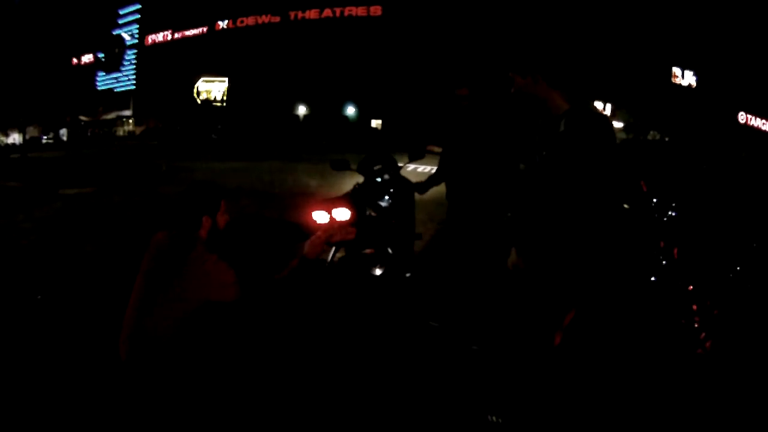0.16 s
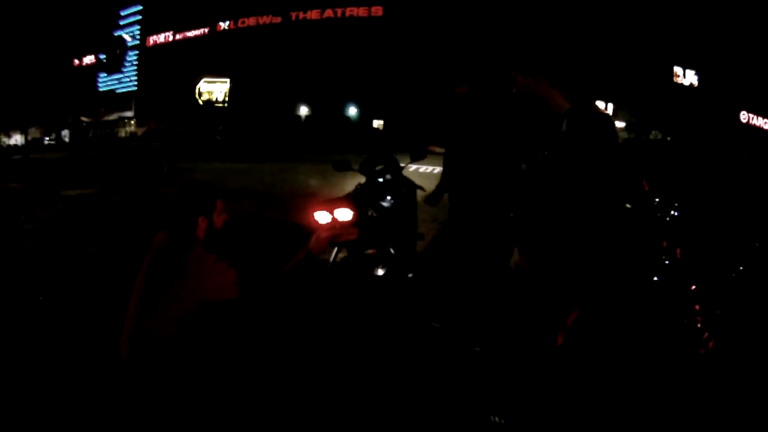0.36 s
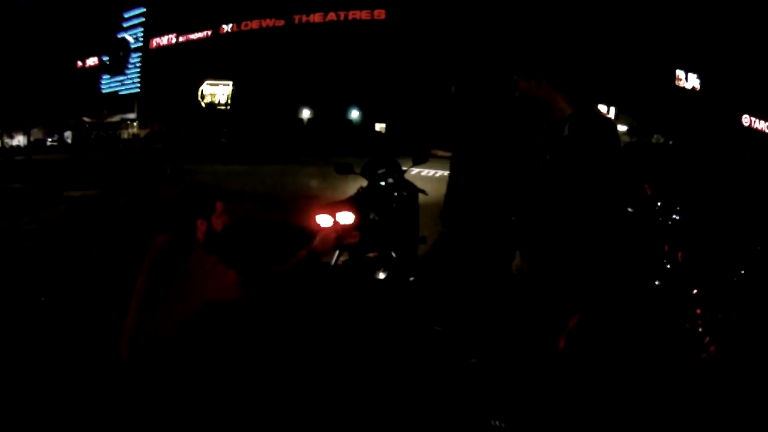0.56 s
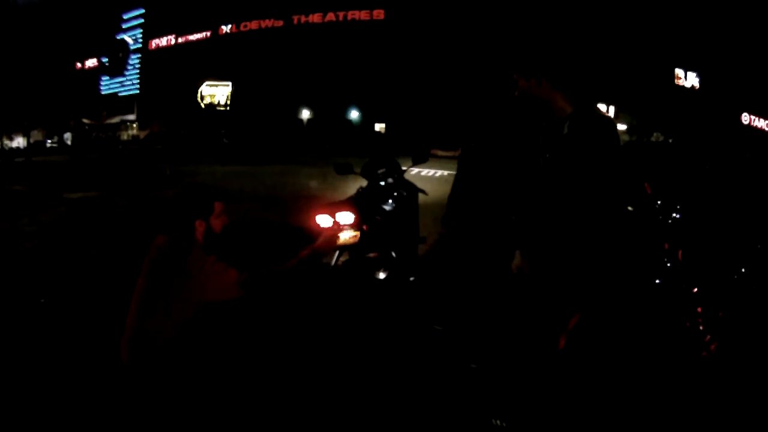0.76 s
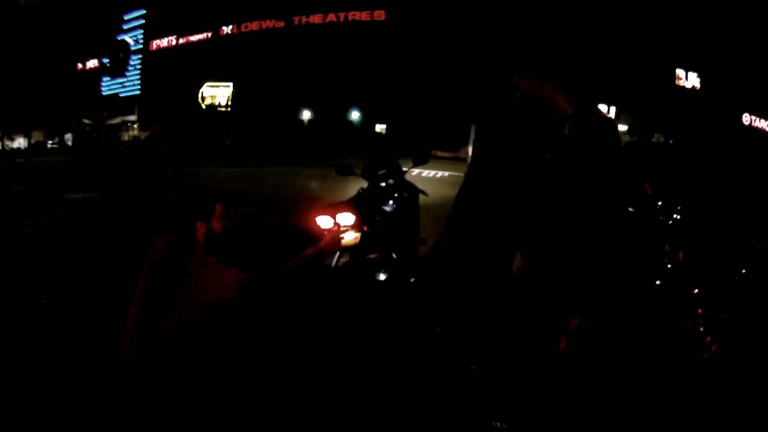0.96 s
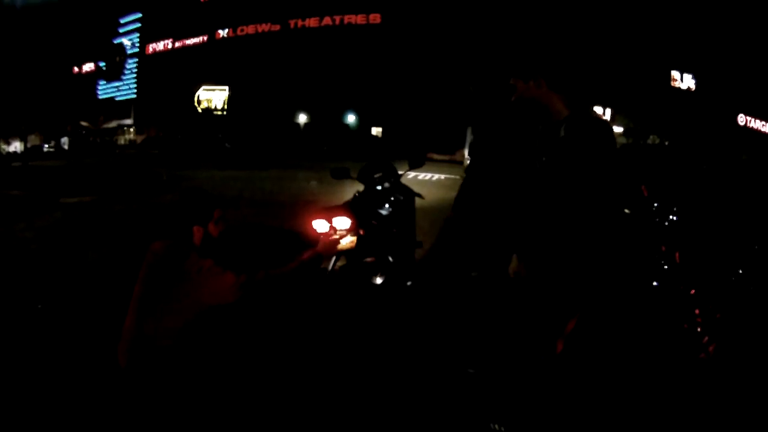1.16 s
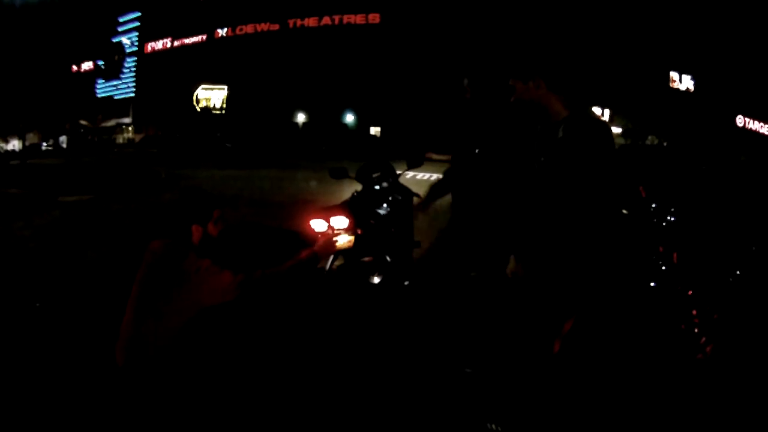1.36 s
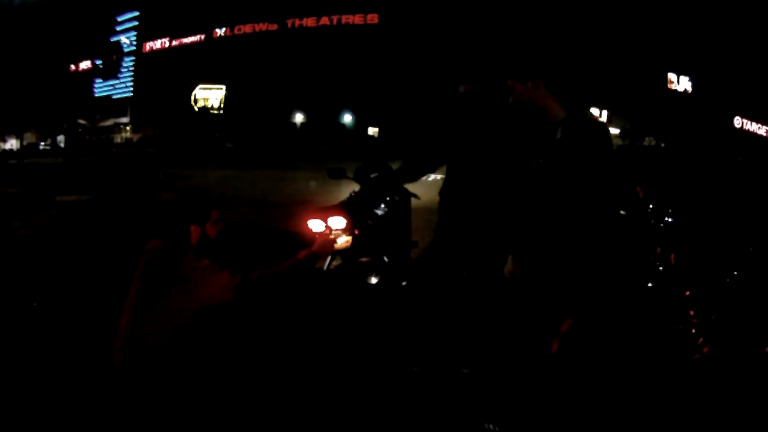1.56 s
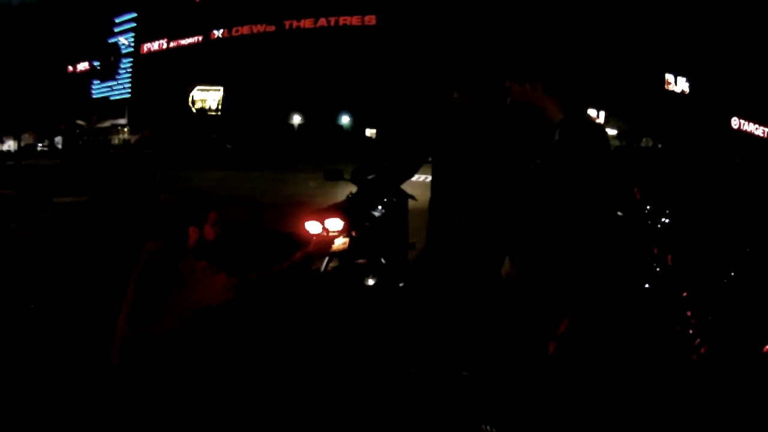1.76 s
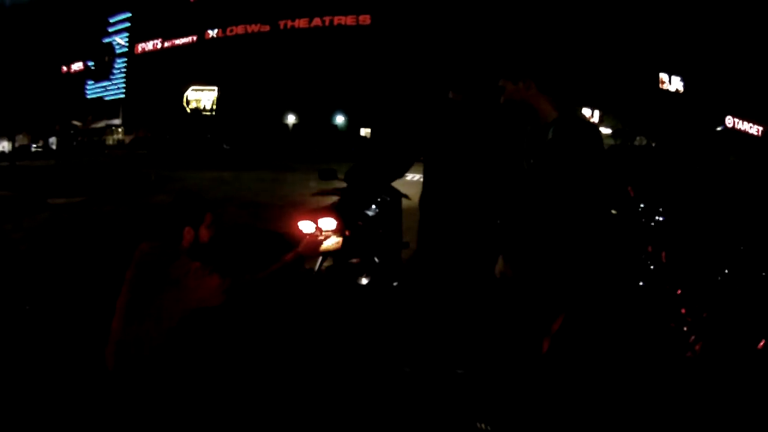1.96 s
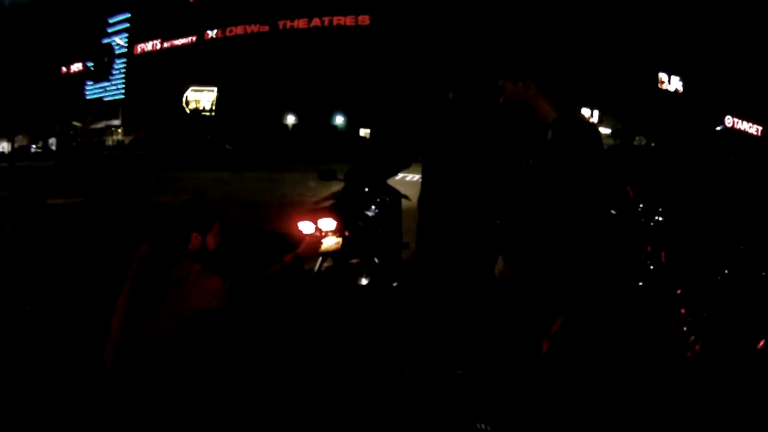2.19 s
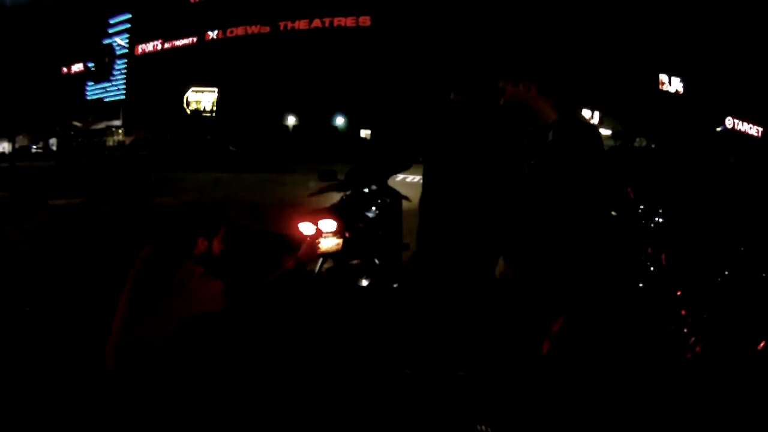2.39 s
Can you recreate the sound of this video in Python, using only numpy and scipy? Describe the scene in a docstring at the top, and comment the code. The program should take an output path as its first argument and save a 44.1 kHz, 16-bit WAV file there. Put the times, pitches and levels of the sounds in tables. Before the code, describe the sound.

Idling motorcycles, a lumpy twin-cylinder thump over a smooth low purr, soft hiss and brief handling clicks

```python
"""In a parking area at night, motorcycles idle. A 90-degree V-twin thumps unevenly: firing kicks ring its exhaust and
echo, while valve gear contacts ring its cylinder head every cycle. A second engine purrs at a slowly rising speed, made
of sine tones and filtered firing kicks; a third drones faintly in sine tones. Filtered noise makes a low rumble and
a mechanical hiss. A few small hard clicks and soft brushes of noise sound close to the microphone."""
import sys
import numpy as np
from scipy import signal
from scipy.fft import rfft, irfft, next_fast_len
from scipy.io import wavfile

SR = 44100
rng = np.random.default_rng(int(sys.argv[2]) if len(sys.argv) > 2 else 0)


def unload_wav(signal):
    """Save mono or channel-first audio to the path in sys.argv[1] as 16-bit WAV at rate SR, clipped to [-1, 1]."""
    wavfile.write(
        sys.argv[1],
        SR,
        np.round(np.clip(np.atleast_2d(signal).T, -1, 1) * 32767).astype(np.int16),
    )


N = 111573  # length in samples


def from_db(db):
    """Turn decibels into a gain."""
    return 10 ** (np.asarray(db) / 20)


def rms_one(x):
    """Scale a sound to an average (rms) level of 1."""
    return x / np.sqrt(np.mean(x ** 2) + 1e-20)


def turns(rows):
    """Add up a changing rate, given as (t/s, rate), into the number of turns so far."""
    s, rate = np.transpose(rows)
    return np.cumsum(np.interp(np.arange(N) / SR, s, rate)) / SR


def drift(rate_hz):
    """Wander slowly at random with a spread of 1: noise smoothed twice, worked out every 40 samples."""
    step = 40
    r = np.exp(-2 * np.pi * rate_hz * step / SR)
    noise = rng.standard_normal(N // step + 2002)
    slow = signal.lfilter([1], [1, -2 * r, r * r], noise)[2000:]  # skip the start-up
    return np.interp(np.arange(N) / step, np.arange(len(slow)), rms_one(slow))


def colour(x, points):
    """Shape the spectrum by (f/Hz, level/dB) without sounding early; white noise keeps its level."""
    size = 2 * next_fast_len(N)
    hz, db = np.transpose(points)
    bins_hz = np.arange(size // 2 + 1) * SR / size
    gain = rms_one(from_db(np.interp(np.log(bins_hz + 1), np.log(hz), db)))
    # folding the cepstrum forward gives the minimum-phase filter
    cepstrum = irfft(np.log(gain))[:size // 2]
    cepstrum[1:] *= 2
    return irfft(rfft(x, size) * np.exp(rfft(cepstrum, size)))[:N]


def resonate(x, modes):
    """Ring several resonances side by side; the narrower one is, the longer it rings."""
    out = 0
    for hz, width_hz, db in modes:
        r = np.exp(-np.pi * width_hz / SR)
        feedback = [1, -2 * r * np.cos(2 * np.pi * hz / SR), r * r]
        ringing = signal.lfilter([1, 0, -1], feedback, x + 1e-18)
        out = out + from_db(db) * (1 - r * r) / 2 * ringing
    return out


def bursts(kicks, decay_s):
    """Let each kick set off a puff of noise that dies away."""
    fading = signal.lfilter([1], [1, -np.exp(-1 / (decay_s * SR))], kicks + 1e-18)
    return fading * rng.standard_normal(N)


# spectrum of the engines' rumble: [f/Hz, relative level/dB per Hz]
RUMBLE_SPECTRUM = [(15, -16), (30, -4), (55, 3), (90, 3.5), (140, -1.5), (190, -23.5), (280, -14.5),
                   (350, -23), (470, -30), (560, -26), (1000, -30), (1400, -33.5), (3000, -59.5)]
RUMBLE_DB = -42.5


def rumble():
    """The engines' diffuse rumble: steady noise, strongest in the bass."""
    return from_db(RUMBLE_DB) * colour(rng.standard_normal(N), RUMBLE_SPECTRUM)


# spectrum of the hiss, coloured by the microphone's port: [f/Hz, relative level/dB per Hz]
HISS_SPECTRUM = [(300, -22.5), (700, -20.5), (1150, -13), (1420, -22.5), (1650, -12), (1900, -4),
                 (2150, 1.5), (2320, -6.5), (2540, -3.5), (2680, -14), (3150, -15.5), (3350, -12.5),
                 (3750, -16), (4100, -20), (5300, -24), (6000, -38.5), (6700, -27), (8600, -22),
                 (9250, -23), (9850, -12), (10700, -33.5), (11400, -32), (11900, -26), (12700, -32),
                 (13450, -32.5), (14150, -14), (14800, -31.5), (15400, -23)]
HISS_DB, HISS_PUFF_DB, PUFF_SWELL_S = -48, -57.5, 0.0014
HISS_THROB, HISS_FLICKER_DB = 0.027, 1.0  # throb as a share of the level; spread of the flicker


def hiss(firings):
    """Mechanical hiss: noise that throbs with the second engine and puffs at each firing of the twin."""
    throb = 1 + HISS_THROB * np.sin(2 * np.pi * turns(SECOND_FIRING_RATE))
    flicker = from_db(HISS_FLICKER_DB * drift(27))
    steady = rms_one(throb * flicker * rng.standard_normal(N))
    r = np.exp(-1 / (PUFF_SWELL_S * SR))
    swells = signal.lfilter([1], [1, -2 * r, r * r], firings + 1e-18)  # rise, then fall
    puffs = rms_one(swells * rng.standard_normal(N))
    return colour(from_db(HISS_DB) * steady + from_db(HISS_PUFF_DB) * puffs, HISS_SPECTRUM)


WAVER_RAD = 0.45  # spread of the phase


def even_engine(rate_rows, partials):
    """A smooth-running engine: sine tones at multiples of its firing rate, wavering in phase."""
    phase = 2 * np.pi * turns(rate_rows)
    out = 0
    for multiple, db in partials:
        start = 2 * np.pi * rng.random()
        tone = np.sin(round(multiple) * phase + start + WAVER_RAD * drift(12.3))
        out = out + from_db(db) * rms_one(tone)
    return out


# firing rate of the third engine: [t/s, f/Hz]
THIRD_FIRING_RATE = [(0, 36.1), (.66, 36.26), (2.53, 35.12)]
# tones of the third engine: [multiple of the firing rate, level/dB]
DRONE_PARTIALS = [(2, -55), (4, -56), (5, -58), (6, -61.5)]


def drone():
    """The third engine's faint drone: a few tones that follow its firing rate."""
    return even_engine(THIRD_FIRING_RATE, DRONE_PARTIALS)


# firing rate of the second engine, also felt in its purr and the hiss: [t/s, f/Hz]
SECOND_FIRING_RATE = [(0.0, 68), (0.1, 65.6), (0.25, 70.28), (0.56, 69.78), (0.62, 73.04), (1.19, 74.64),
                      (1.49, 72.53), (1.93, 76.39), (2.53, 75.36)]
# low tones of the second engine: [multiple of the firing rate, level/dB]
HUM_PARTIALS = [(1, -45), (2, -56), (4, -55.5)]


def hum():
    """The second engine's hum: low tones that follow its firing rate."""
    return even_engine(SECOND_FIRING_RATE, HUM_PARTIALS)


# strength of the second engine's four cylinders in firing order: [relative level/dB]
CYLINDER_STRENGTHS = [0, -2, -8, -2]
# response of its exhaust pipe: [f/Hz, relative level/dB]
PIPE_RESPONSE = [(120, -27.5), (215, -12), (260, 1.5), (300, 4), (380, -1), (460, -4.5), (500, -8.5),
                 (560, -29), (700, -41), (1500, -64.5)]
PURR_DB, PURR_RISE_DB_PER_S = -49.5, 0.2
PURR_SPREAD_DB, PURR_JITTER_S = 4.5, 0.00026


def purr():
    """The second engine's four cylinders fire in turn into its pipe, unevenly and slowly growing."""
    numbers = np.arange(200)  # more firings than fit; the rest are dropped
    late, strength = rng.standard_normal((2, len(numbers)))
    on_time = np.interp(numbers, turns(SECOND_FIRING_RATE), np.arange(N) / SR, right=-1)
    s = on_time + PURR_JITTER_S * late
    uneven = PURR_SPREAD_DB * np.minimum(strength, .5)  # firings vary more downwards than upwards
    db = np.resize(CYLINDER_STRENGTHS, len(numbers)) + uneven + PURR_RISE_DB_PER_S * s
    at, kicks = (s * SR).astype(int), np.zeros(N)
    heard = (at >= 0) & (at < N)
    kicks[at[heard]] = from_db(db[heard])
    return from_db(PURR_DB) * rms_one(colour(kicks, PIPE_RESPONSE))


# hard clicks: [t/s, level/dB, decay/s, share of ringing 0-1]
CLICK_EVENTS = [(.9201, -21, 0.00074, 0.67), (0.921, -24, 0.00042, .7), (1.1532, -28, 0.0013, 0),
                (1.172, -29.5, 0.00091, .06)]
# resonances of the clicked part: [f/Hz, width/Hz, relative level/dB]
CLICK_RESONANCES = [(1280, 68, -7), (1825, 140, -3.5), (1990, 170, -21), (2320, 160, -2), (3360, 140, 10.5),
                    (3610, 140, 11), (8200, 140, 19), (8600, 160, 13)]
# spectrum of a click's crack: [f/Hz, relative level/dB per Hz]
CRACK_SPECTRUM = [(300, -34), (700, 2), (1100, -0.5), (1650, 15), (2300, 9.5), (3000, -13), (3600, 1),
                  (4500, -37), (6000, -39), (8000, -19.5), (10000, -2.5), (11500, -30), (13000, -9),
                  (14200, -6), (15500, -35)]
CLICK_ROUGH = 0.22  # amount of noise in the crack
CLICK_LENGTH_S = 0.00083  # a click's level is its energy averaged over this time


def clicks():
    """Hard clicks: a sharp kick with a puff of noise cracks and makes the clicked part ring briefly."""
    out = np.zeros(N)
    for s, db, decay_s, share in CLICK_EVENTS:
        kick = 1. * (np.arange(N) == int(s * SR))
        crack = rms_one(colour(kick + CLICK_ROUGH * bursts(kick, decay_s), CRACK_SPECTRUM))
        ringing = rms_one(resonate(crack, CLICK_RESONANCES))
        click = np.sqrt(share) * ringing + np.sqrt(1 - share) * crack
        out += from_db(db) * rms_one(click) * np.sqrt(CLICK_LENGTH_S * SR / N)
    return out


# soft brushes: [t/s at the peak, level/dB before the treble is softened, half length/s]
BRUSH_EVENTS = [(0.918, -33, 0.0039), (.952, -43.5, 0.0063), (1.101, -42.5, .0014), (1.137, -32, 0.0018)]
BRUSH_TOP_HZ = 6030


def brushes():
    """Soft brushes: noise with the hiss's colour and less treble swells and fades around the clicks."""
    t = np.arange(N) / SR
    swell = sum(from_db(db) * np.exp(-.5 * ((t - s) / half_s) ** 2) for s, db, half_s in BRUSH_EVENTS)
    noise = colour(swell * rng.standard_normal(N), HISS_SPECTRUM)
    return signal.sosfilt(signal.butter(1, BRUSH_TOP_HZ, fs=SR, output="sos"), noise)


# speed of the V-twin: [t/s, speed/rpm]
TWIN_SPEED = [(0.0, 1329), (0.35, 1337), (0.55, 1250), (0.85, 1241), (1.2, 1338), (1.5, 1317), (1.95, 1219),
              (2.2, 1268), (2.53, 1254)]
FIRST_CYCLE_S, TWIN_JITTER_S = .071, 0.001


def each_cycle(rows, spread_db):
    """Kick at set places of every four-stroke cycle of the twin, varying a little in time and strength."""
    t = np.arange(N) / SR
    cycle = turns(TWIN_SPEED) / 120  # 60 s a minute, two turns a cycle
    cycle -= np.interp(FIRST_CYCLE_S, t, cycle)
    kicks, numbers = np.zeros(N), np.arange(-1, 30)
    for place, db in rows:
        late, strength = rng.standard_normal((2, len(numbers)))
        on_time = np.interp(numbers + place, cycle, t, left=-1, right=-1)  # -1: outside the scene
        at = ((on_time + TWIN_JITTER_S * late) * SR).astype(int)
        heard = (at >= 0) & (at < N)
        kicks[at[heard]] += from_db(db + spread_db * strength)[heard]
    return kicks


# valve gear contacts: [place in the cycle 0-1, relative level/dB]
VALVE_CONTACTS = [(0.0, -5.5), (.065, -9.5), (.29, -15.5)]
# resonances of the cylinder head: [f/Hz, width/Hz, relative level/dB]
HEAD_RESONANCES = [(955, 78, 2), (1078, 69, 4), (1238, 46, -2)]
# what the cover lets through: [lower f/Hz, upper f/Hz]
COVER_BAND = [840, 1240]
CLATTER_DB, CLATTER_SPREAD_DB = -61.5, 1.2
CLATTER_ROUGH, CLATTER_DECAY_S = 0.067, 0.0034  # amount and decay of the rasp


def twin_clatter():
    """Valve gear contacts with a short rasp ring the cylinder head; its cover passes only the middle."""
    kicks = each_cycle(VALVE_CONTACTS, CLATTER_SPREAD_DB)
    rasp = CLATTER_ROUGH * bursts(kicks, CLATTER_DECAY_S)
    ringing = resonate(kicks + rasp, HEAD_RESONANCES)
    cover = signal.butter(2, COVER_BAND, "band", fs=SR, output="sos")
    return from_db(CLATTER_DB) * rms_one(signal.sosfilt(cover, ringing))


# the twin's two firings: [place in the cycle 0-1, relative level/dB]
TWIN_FIRINGS = [(.035, -3.5), (.405, 0)]


def twin_firings():
    """The twin's two cylinders fire at uneven distances in the cycle, with a strength that varies by 3 dB."""
    return each_cycle(TWIN_FIRINGS, 3)


# resonances of the exhaust: [f/Hz, width/Hz, relative level/dB]
EXHAUST_RESONANCES = [(69.5, 46, -2), (125, 15, -5), (277, 124, -22), (432, 37, -22)]
# echoes of the exhaust: [delay t/s, relative level/dB]
EXHAUST_ECHOES = [(0.015, -15), (0.03, -17), (0.051, -5)]
EXHAUST_DB, EXHAUST_TOP_HZ = -46, 414


def twin_exhaust(firings):
    """Each firing thumps through the muffler and returns from the surroundings."""
    muffler = signal.butter(4, EXHAUST_TOP_HZ, fs=SR, output="sos")
    thumps = signal.sosfilt(muffler, resonate(firings, EXHAUST_RESONANCES))
    t = np.arange(N) / SR
    echoes = sum(from_db(db) * np.interp(t - delay_s, t, thumps, left=0) for delay_s, db in EXHAUST_ECHOES)
    return from_db(EXHAUST_DB) * rms_one(thumps + echoes)


def scene():
    """Three engines, their rumble and hiss, and the clicks and brushes."""
    firings = twin_firings()
    background = rumble() + hiss(firings)
    others = drone() + hum() + purr()
    close_by = clicks() + brushes()
    twin = twin_clatter() + twin_exhaust(firings)
    return (background + others + close_by + twin)[None]


CUTOFF_HZ = 15400


def record(dry):
    """Cut the top of the treble off steeply."""
    return signal.sosfilt(signal.ellip(10, .1, 80, CUTOFF_HZ, fs=SR, output="sos"), dry)


dry = scene()
out = record(dry)
unload_wav(out)
```